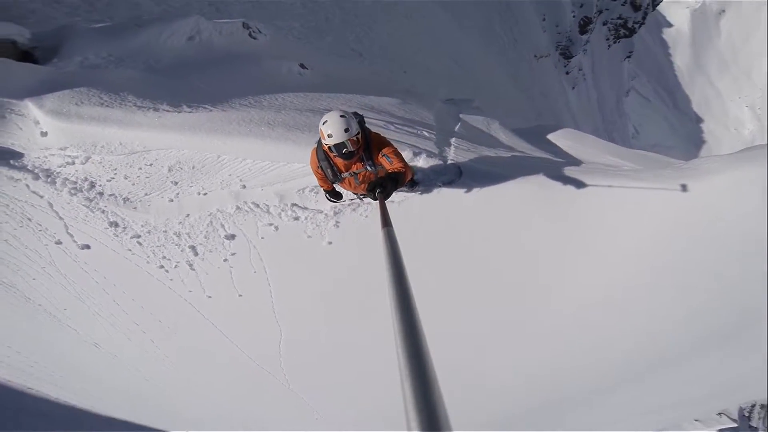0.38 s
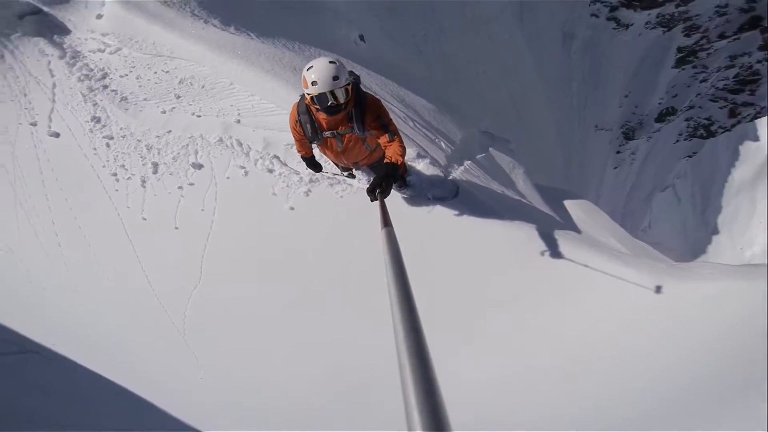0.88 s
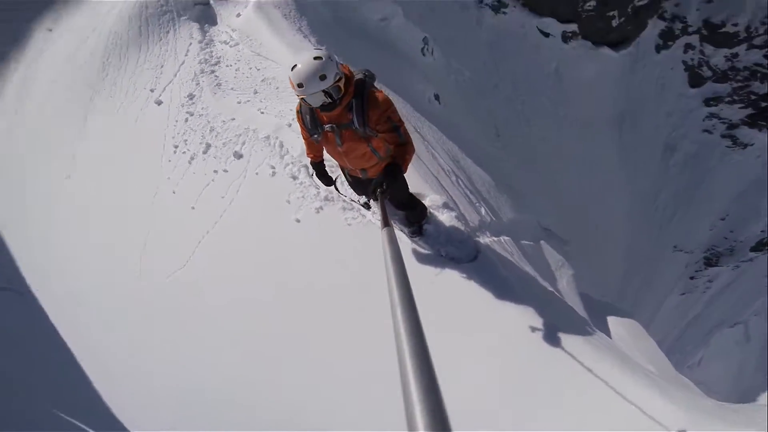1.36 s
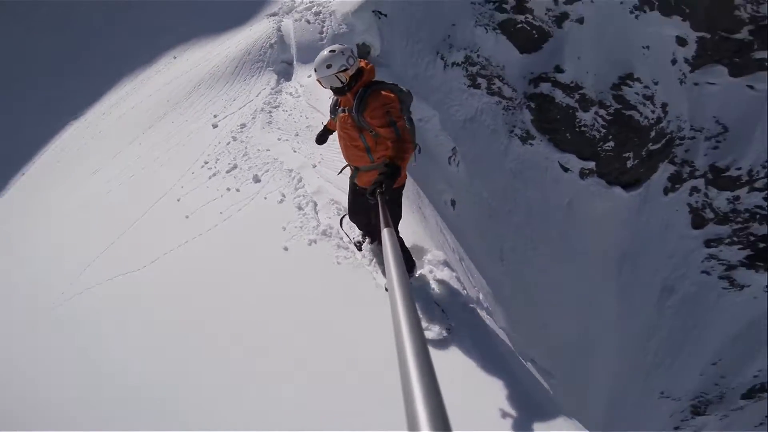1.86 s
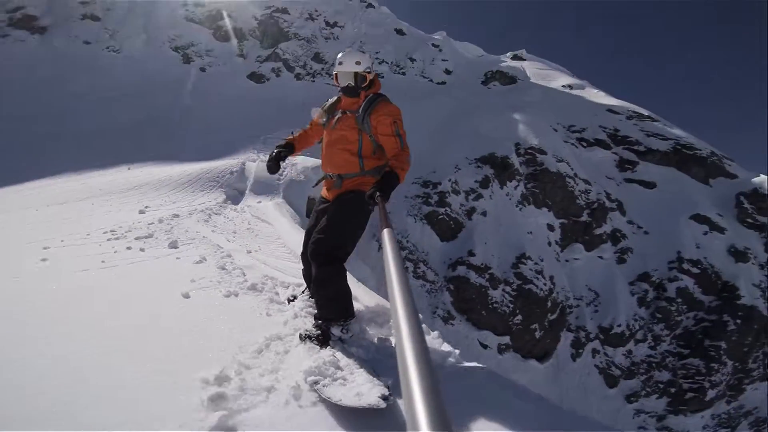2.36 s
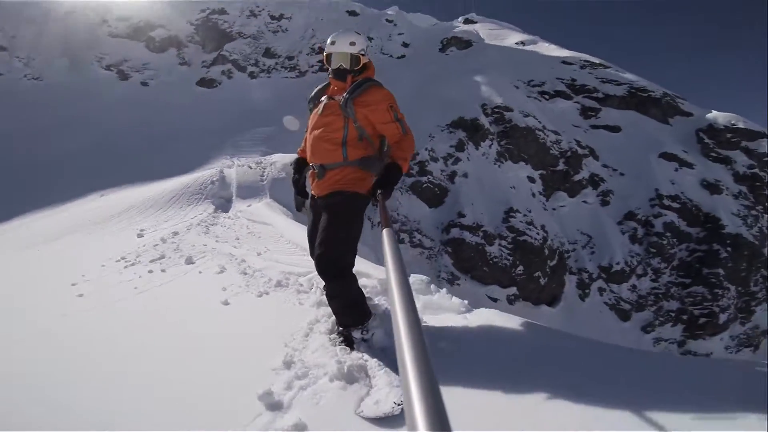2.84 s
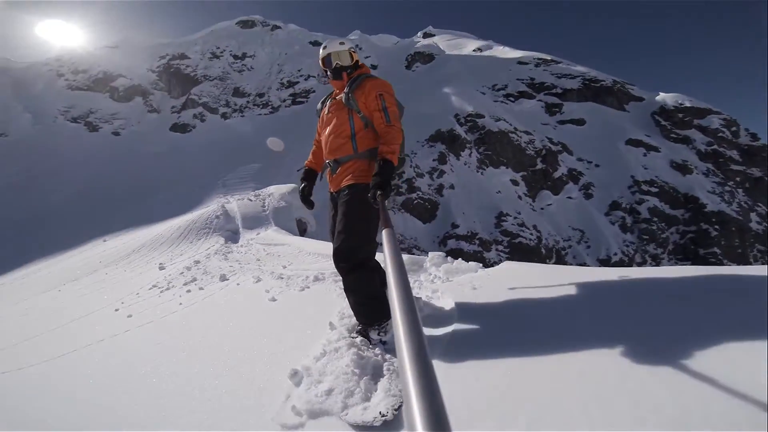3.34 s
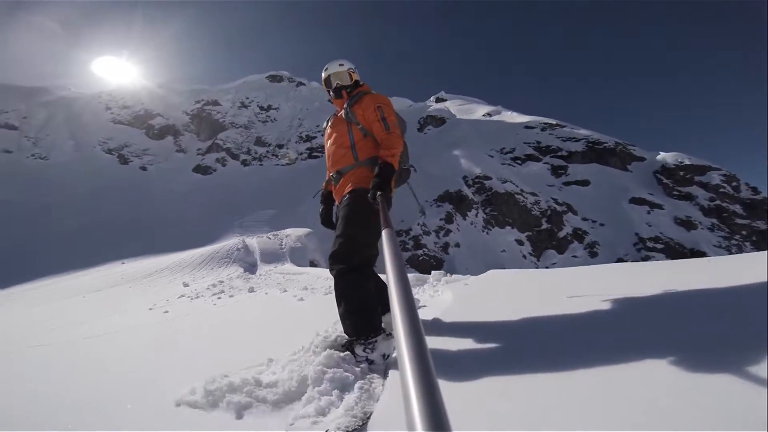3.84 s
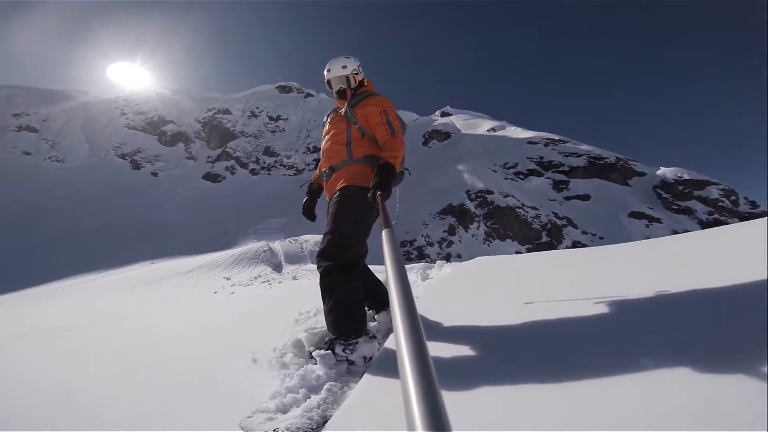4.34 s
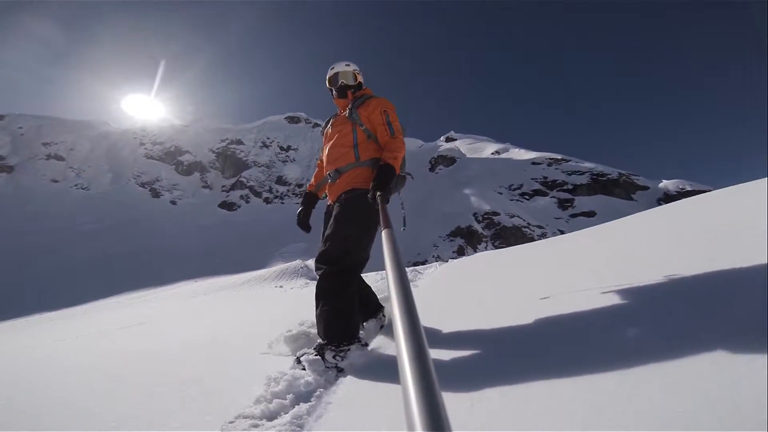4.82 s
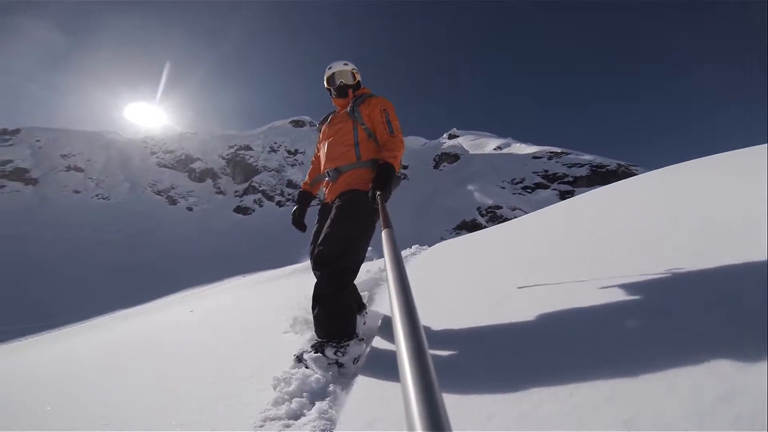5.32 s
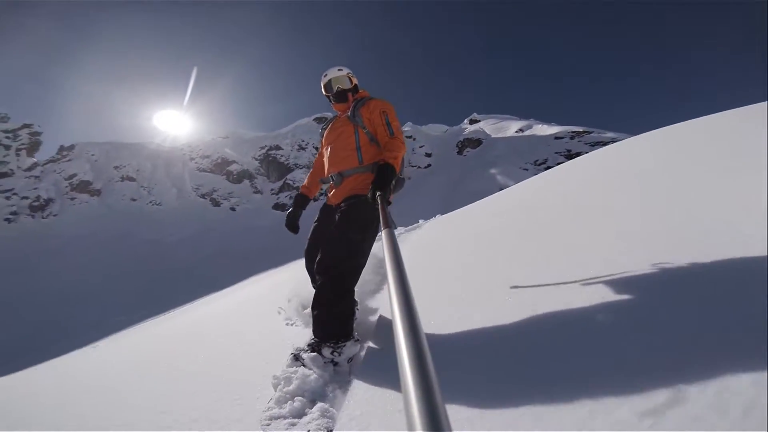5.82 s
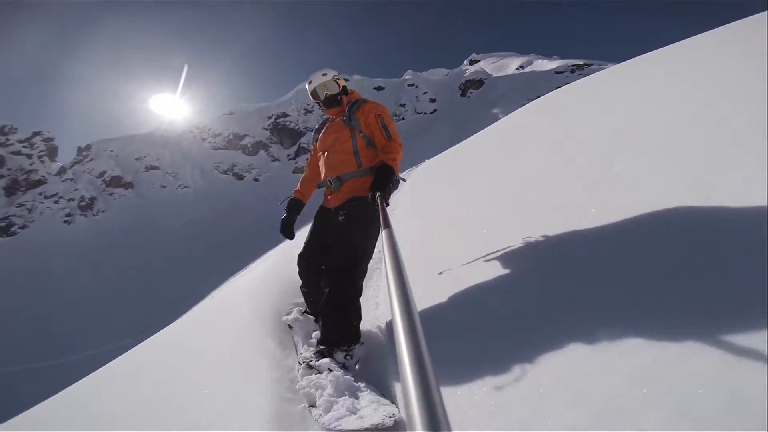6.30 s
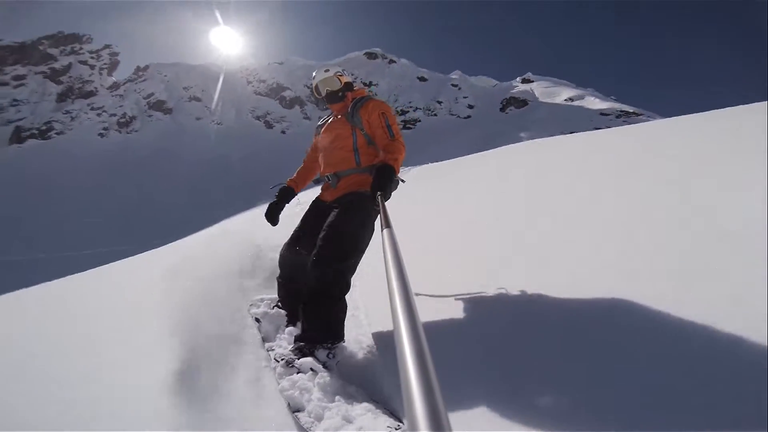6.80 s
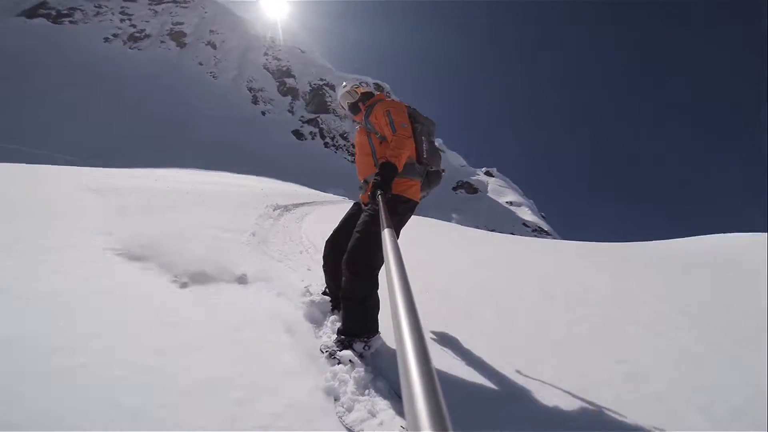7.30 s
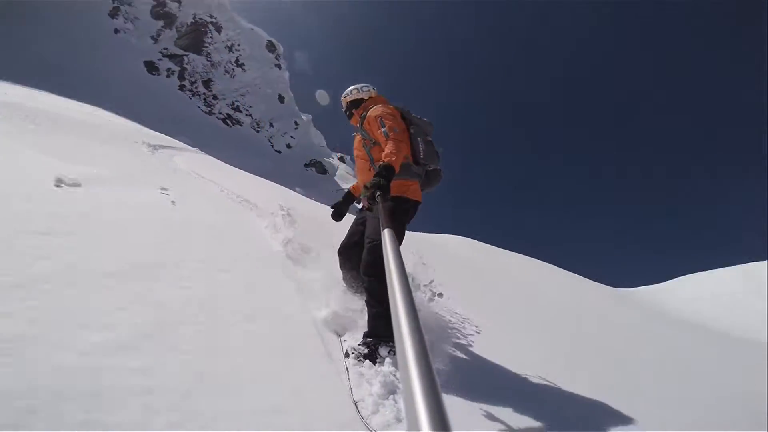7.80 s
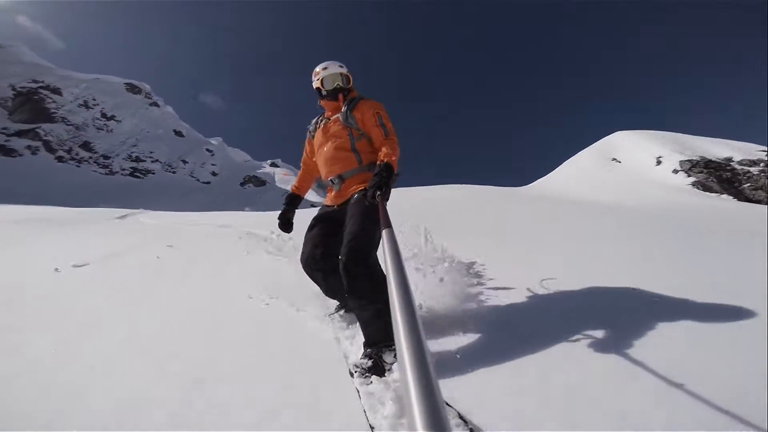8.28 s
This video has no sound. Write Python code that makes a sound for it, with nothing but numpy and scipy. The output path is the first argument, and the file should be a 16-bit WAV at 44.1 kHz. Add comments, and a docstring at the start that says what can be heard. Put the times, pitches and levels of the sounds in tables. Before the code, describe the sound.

Muffled bass wind buffets run throughout, heard close up through a sealed camera housing. A glove squeaks and rubs on the pole, a click snaps, small hollow ticks rattle, and a strong knock arrives with overloaded low thumps. The ride then smooths out: a breathy hum passes, snow grains hiss and the board base rushes faintly over open powder. A lone knock and a final flurry of handling noise come near the end.

```python
"""A small camera in a closed housing, on a hand-held pole in front of a snowboarder on an open slope.
Deep wind and pole-sway thumps run throughout over a faint hiss; early on the glove rubs the pole.
At 1.5 s there is a sharp click; pole ticks follow, with the hardest gust, rub and knock near 2.9 s.
As speed builds, board rush, spray hiss and a passing hum grow from filtered noise; a narrow hiss
joins from 4.8 to 6.1 s. Late rubs and ticks, clicks ringing the housing modes, come at 8.2 s."""
import sys
import numpy as np
from scipy import signal
from scipy.fft import rfft, irfft, next_fast_len
from scipy.io import wavfile
from scipy.ndimage import uniform_filter1d

SR = 44100
rng = np.random.default_rng(int(sys.argv[2]) if len(sys.argv) > 2 else 0)


def generate_wav(sig):
    """Save sig (samples, or channels by samples) to the path in sys.argv[1] as 16-bit PCM at SR."""
    pcm = np.round(np.clip(np.atleast_2d(sig).T, -1, 1) * 32767).astype(np.int16)
    wavfile.write(sys.argv[1], SR, pcm)


def boost(x):
    """Linear amplitude factor 10**(x/20) for a level x in decibels (scalar or array-like)."""
    u = np.asarray(x, float) / 20
    return 10 ** u


N = 370881


def rms_one(x):
    """Scale to rms 1."""
    return x / np.sqrt(np.mean(x ** 2) + 1e-20)


def in_time(rows):
    """Each column of a curve, interpolated to every sample."""
    time_s, *columns = np.transpose(rows)
    return [np.interp(np.arange(N) / SR, time_s, column) for column in columns]


def drift(rate_hz):
    """Slow random curve of rms 1: noise twice through a one-pole low-pass, drawn at SR / 20."""
    pole = np.exp(-40 * np.pi * rate_hz / SR)
    noise = rng.standard_normal(N // 20 + 3002)
    slow = signal.lfilter([1], [1, -2 * pole, pole * pole], noise)[3000:]  # settled part
    return np.interp(np.arange(N) / 20, np.arange(len(slow)), rms_one(slow))


def coloured(spectrum):
    """Noise with the given spectrum, rms 1."""
    size = next_fast_len(N)
    hz, db = np.transpose(spectrum)
    bin_hz = np.fft.rfftfreq(size, 1 / SR)
    gain = boost(np.interp(np.log(bin_hz + 1), np.log(hz), db))
    return rms_one(irfft(rfft(rng.standard_normal(size)) * gain, size)[:N])


def resonance(x, hz, width_hz):
    """Two-pole resonance with gain 1 on top."""
    r = np.exp(-np.pi * width_hz / SR)
    numerator = np.array([1, 0, -1]) * (1 - r * r) / 2
    denominator = [1, -2 * r * np.cos(2 * np.pi * hz / SR), r * r]
    return signal.lfilter(numerator, denominator, x + 1e-18)


def butter(x, order, hz, kind="low"):
    """Butterworth filter along the last axis."""
    return signal.sosfilt(signal.butter(order, hz, kind, fs=SR, output="sos"), x)


def hiss(peaks, patchy_db, rate_hz, order=1):
    """Noise in resonances that swell slightly together, mostly alone; order 2 darkens the valleys; rms 1."""
    together, out = drift(rate_hz), 0
    for hz, width_hz, db in peaks:
        band = rng.standard_normal(N)
        for _ in range(order):
            band = resonance(band, hz, width_hz)
        swell_db = patchy_db * (0.06 * together + drift(rate_hz * 5.9))
        out = out + boost(db + swell_db) * band
    return rms_one(out)


# Microphone hiss peaks, shaped by its port: [centre_hz, width_hz, gain_db]
SELF_NOISE_PEAKS = [(1470, 1340, 2), (3035, 320, 10), (5130, 590, -2.5), (6900, 2200, -10), (10290, 260, 0),
                    (11220, 750, -4), (13400, 600, -10)]
SELF_NOISE_DB = -67


def self_noise():
    """The microphone's own hiss: noise through the resonances of its port."""
    return boost(SELF_NOISE_DB) * hiss(SELF_NOISE_PEAKS, patchy_db=3.0, rate_hz=21.0)


HIGH_HISS_HZ, HIGH_HISS_WIDTH_HZ, HIGH_HISS_DB = 7070, 1400, -73
HIGH_HISS_FROM_S, HIGH_HISS_TO_S, HIGH_HISS_FADE_DB_PER_S = 4.77, 6.1, 41


def high_hiss():
    """Narrow treble hiss: noise twice through one resonance, held for a while, faded at both ends."""
    t = np.arange(N) / SR
    outside_s = np.maximum(np.maximum(HIGH_HISS_FROM_S - t, t - HIGH_HISS_TO_S), 0)
    band = hiss([(HIGH_HISS_HZ, HIGH_HISS_WIDTH_HZ, 0)], patchy_db=-1.5, rate_hz=8.7, order=2)
    return boost(HIGH_HISS_DB - HIGH_HISS_FADE_DB_PER_S * outside_s) * band


# Gusts on the housing: [time_s, rumble_db]
GUSTS = [(0.0, -20.5), (0.14, -34), (0.44, -25.5), (0.49, -38), (0.63, -21.5), (0.91, -18), (1.2, -28),
         (1.59, -24.5), (1.75, -19), (1.87, -21.5), (1.96, -26), (2.36, -23.5), (2.44, -22.5),
         (2.55, -23.5), (2.71, -18), (2.81, -36), (2.9, -12), (2.98, -7.5), (3.06, -12), (3.15, -7.5),
         (3.3, -24), (3.54, -20.5), (3.75, -24.5), (3.93, -31), (4.3, -28), (4.65, -29.5), (4.85, -25),
         (4.92, -30.5), (5.7, -32.5), (6.0, -27), (6.9, -30.5), (7.2, -23.5), (7.45, -26.5), (7.89, -24.5),
         (8.05, -22.5), (8.25, -17.5), (8.41, -18)]
# Upper rumble against the gusts: [time_s, swell_db]
UPPER_RUMBLE_SWELL = [(0, 2), (0.3, 1), (0.75, -1.5), (1.2, -3), (1.8, 2), (2.3, -1), (2.95, 3), (3.2, 0),
                      (4.0, -0.5), (4.8, -0.5), (5.25, 5), (5.75, 2), (6.2, 1.5), (6.75, 4.5), (7.3, 0.5),
                      (7.8, -1), (8.1, -4.5), (8.41, -4)]
# Rumble spectrum, relative: [freq_hz, density_db_per_hz]
RUMBLE_SPECTRUM = [(3.5, -41), (6.0, -9), (27, 3.5), (38, -0.5), (52, -6.5), (65, -37.5), (70, -47),
                   (91, -70), (150, -120)]
# Upper rumble spectrum, relative: [freq_hz, density_db_per_hz]
UPPER_RUMBLE_SPECTRUM = [(32, -49.5), (55, -1), (65, -6.5), (102, -14), (160, -33), (210, -61.5),
                         (350, -120)]
# Air rush spectrum, relative: [freq_hz, density_db_per_hz]
AIR_SPECTRUM = [(76, -36.5), (130, -7), (211, -3.5), (317, -7.5), (420, -9.5), (1200, -22), (1560, -57.5),
                (2640, -120)]
GUST_SMOOTH_S = 0.18  # upper layers follow the gusts this slowly
UPPER_DB, UPPER_FOLLOWS = -12.5, 1.205  # offset, share of the gust level in dB
RUSH_DB, RUSH_FOLLOWS = -44, 0.72  # likewise
HEADWIND_DB = -5  # against the board's rush


def wind():
    """Lumpy bass pressure swings; upper rumble and a faint rush follow the gusts, the rush also the ride."""
    rumble_db, = in_time(GUSTS)
    swell_db, = in_time(UPPER_RUMBLE_SWELL)
    board_db, _ = in_time(RIDE)
    gust_db = uniform_filter1d(rumble_db, size=int(GUST_SMOOTH_S * SR))
    low = boost(rumble_db) * coloured(RUMBLE_SPECTRUM)
    upper_db = UPPER_DB + swell_db + UPPER_FOLLOWS * gust_db + 2.26 * drift(5.4)
    upper = boost(upper_db) * coloured(UPPER_RUMBLE_SPECTRUM)
    rush_gain = np.hypot(boost(RUSH_DB + RUSH_FOLLOWS * gust_db), boost(HEADWIND_DB + board_db))
    rush = rush_gain * boost(2.17 * drift(7.5)) * coloured(AIR_SPECTRUM)
    return low + upper + rush


CLICK_S, CLICK_DB, CLICK_FADE_S = 1.4895, -19, 0.016  # CLICK_DB: height of the whole step


def step_click():
    """A sharp click: the waveform slides down, steps up at once and decays back, both exponentially."""
    t = np.arange(N) / SR - CLICK_S
    return boost(CLICK_DB) / 2 * np.sign(t) * np.exp(-np.abs(t) / CLICK_FADE_S)


POLE_CUT_HZ = 4800


def through_pole(x):
    """Low-pass: soft contacts send little treble through pole and mount."""
    return butter(x, 6, POLE_CUT_HZ)


# Housing and pole modes: [centre_hz, width_hz, gain_db]
HOUSING_MODES = [(200, 37, -1), (350, 98, -4.5), (441, 57, -7), (610, 72, -3.5), (930, 440, -14.5),
                 (1310, 115, 3), (1490, 127, 1.5), (1658, 74, 4), (1840, 170, -15), (2103, 200, -7.5),
                 (2380, 320, -14.5), (2700, 86, -9), (2970, 100, -9)]


def housing(clicks, sway=lambda: 1):
    """Low, middle, high modes (split at 1.1, 2 kHz) rung by clicks, rms 1 each; sway: gain per mode."""
    groups = np.zeros((3,) + clicks.shape)
    for k, (hz, width_hz, db) in enumerate(HOUSING_MODES):
        group = int(hz > 1100) + int(hz > 2000)
        sign = (-1) ** k
        groups[group] += sign * boost(db) * sway() * resonance(clicks, hz, width_hz)
    groups = through_pole(groups)
    return groups / np.sqrt(np.mean(groups ** 2, axis=-1, keepdims=True))


# Ticks and knocks in the pole; low and high rings relative to the middle one:
# [start_s, peak_db, knock_db, low_db, high_db]
POLE_TICKS = [(0.606, -40, -57, -5, -17), (0.716, -38, -60, -15, -9), (1.5623, -42, -24.5, 10, -26),
              (2.2224, -49.5, -44, 6, 0), (2.251, -41, -36, 4, -6), (2.2759, -44, -37, 3, -4),
              (2.303, -41, -52, 1.5, -7), (2.367, -41, -35, -1, -12), (2.453, -50.5, -72, -12, -3),
              (2.5095, -46, -61, 1.5, -10), (2.692, -38.5, -39, 1, -13), (2.7455, -34.5, -35.5, 0, -8.5),
              (2.817, -42.5, -43, 5.5, -4), (2.8843, -37, -52.5, -5, -6), (2.912, -20, -24, -2.5, -18),
              (3.034, -51, -23, -8, -7), (3.1996, -38.5, -39, -5, -14), (3.24, -39.5, -41.5, -1, -6),
              (3.4368, -34.5, -46, -18, -6), (3.499, -55, -70, -8, 8), (3.5558, -33, -69, 2, -1.5),
              (3.6404, -42.5, -61, 4.5, -5), (3.71, -45, -40.5, 9.5, -3), (3.8207, -41.5, -43, 6, -4),
              (4.34, -44.5, -58, 6, -4.5), (6.994, -24, -28, 2, -5), (8.228, -31.5, -29, -1, -28),
              (8.255, -32.5, -45, 1, -7.5), (8.2998, -33, -51, 2, -24)]
# Pole swings after a knock: [freq_hz, gain_db, t60_s]
KNOCK_SWINGS = [(97, 5.5, 0.16), (164.5, -4.5, 0.14), (217.3, 0.5, 0.093), (326, -2, 0.059),
                (404, -21, 0.13), (559, -26, 0.11), (926, -21, 0.12), (1393, -9, 0.033)]
FLURRY_T60_S, FLURRY_RISE_S = 0.021, 0.0011
MAIN_TOUCH_S, MAIN_TOUCH_SIZE = 0.0012, 4.5  # hard contact just after the first; size before the envelope
CRACK_DB, CRACK_EDGE_DB = -3, 3.5  # dry crack's body and edge, before band-limiting, against the rings' rms
CRACK_T60_S, CRACK_BODY_HZ, CRACK_EDGE_HZ = 0.0024, 1470, (2000, 3370)  # t60 on top of the flurry's
TICK_THIN_HZ, TICK_MIDDLE_CUT_HZ = 490, 1670  # low ring's lower limit, middle ring's upper limit
TICK_LOW_DB, TICK_HIGH_DB = -4.5, -3  # added to each tick's low_db, high_db


def ticks():
    """A flurry of contacts dying in milliseconds rings the housing; a slow push swings the pole."""
    start_s, peak_db, knock_db, low_db, high_db = np.transpose(POLE_TICKS)[:, :, None]
    t = np.arange(4400) / SR
    shape = (len(start_s), len(t))
    contacts = rng.standard_normal(shape) * (rng.random(shape) < 0.12)
    contacts[:, 0] = 1.5  # first touch always lands
    contacts[:, int(MAIN_TOUCH_S * SR)] = MAIN_TOUCH_SIZE
    envelope = boost(-60 * t / FLURRY_T60_S) * (1.15 - np.exp(-t / FLURRY_RISE_S))
    flurry = through_pole(contacts * envelope)
    low, middle, high = housing(flurry)

    # dry crack, past the housing modes
    crack = flurry * boost(-60 * t / CRACK_T60_S)
    crack = crack / np.sqrt(np.mean(crack ** 2, axis=1, keepdims=True))
    low = low + boost(CRACK_DB) * butter(crack, 4, CRACK_BODY_HZ)
    high = high + boost(CRACK_EDGE_DB) * butter(crack, 3, CRACK_EDGE_HZ, "band")

    low = butter(low, 2, (TICK_THIN_HZ, CRACK_BODY_HZ), "band")
    middle = butter(middle, 4, TICK_MIDDLE_CUT_HZ)
    high = butter(high, 6, CRACK_EDGE_HZ[1])
    low, middle, high = (ring / np.abs(ring).max(axis=1, keepdims=True) for ring in (low, middle, high))
    low = boost(TICK_LOW_DB + low_db) * low
    high = boost(TICK_HIGH_DB + high_db) * high
    rings = boost(peak_db) * (low + middle + high)

    end_fade = np.cos(np.pi / 2 * t / t[-1])
    for hz, db, t60_s in KNOCK_SWINGS:
        swing = np.sin(2 * np.pi * hz * t) * boost(-60 * t / t60_s) * (1 - np.exp(-t / 0.0031))
        rings = rings - boost(knock_db + db) * swing * end_fade
    out = np.zeros(N + len(t))
    np.add.at(out, (start_s * SR).astype(int) + np.arange(len(t)), rings)
    return out[:N]


# Glove strokes on the pole; low and high rings relative to the middle one:
# [start_s, length_s, level_db, change_db, high_db, low_db, pitch_hz]
GLOVE_STROKES = [(0.57, 0.017, -63, 5, -14, -4, 1500), (0.608, 0.048, -48.5, -8, -7.5, -5, 1450),
                 (0.666, 0.056, -47.5, 0, -8.5, -4, 1660), (0.723, 0.066, -46.5, -3, -5, -4, 1630),
                 (0.8, 0.075, -59.5, 5, -9, -5, 1500), (0.899, 0.11, -45.5, -6, -12.5, -2, 1580),
                 (1.027, 0.063, -64.5, -5, -14, 5, 1450), (2.854, 0.02, -59, 3, -1, -11, 1600),
                 (2.892, 0.077, -32, 3.5, -13.5, -6, 1670), (2.994, 0.036, -50, -9, -16, 3.5, 1640),
                 (3.032, 0.081, -41, -4, -10.5, -1, 1540), (3.115, 0.19, -53, -2, -11.5, -1.5, 1550),
                 (3.324, 0.27, -62, 3, -13, -1, 1560), (8.211, 0.087, -51, -3, -22, -3, 1500),
                 (8.3, 0.13, -50, 5.5, -18, -3, 1300)]
# High modes, loudest under hard strokes: [centre_hz, width_hz (each of two passes), gain_db]
BITE_MODES = [(3500, 200, 6), (4720, 130, -7), (5650, 100, -16.5), (6150, 150, -9)]
BITE_DB, BITE_FULL_AT_DB, BITE_GROWS = -27.5, -35, 0.15  # share at that stroke level; dB gained per dB
RUB_ATTACK_DB_PER_S, RUB_RELEASE_DB_PER_S = 1192, 689
RUB_ARCH_DB, RUB_SWAY_DB, RUB_CLUMP_DB = 1.5, 1.2, 2.2  # stroke strongest midway; mode sway; slip clumping
RUB_FOCUS_WIDTH_HZ, RUB_FOCUS_SHARE = 140, 0.51  # middle modes favoured near pitch_hz
RUB_EDGE_HZ = 2970


def glove():
    """Stick and slip: dense uneven clicks in clumps ring the housing; strokes set in fast and trail off."""
    slips = rng.random(N) < 5500.0 * boost(2.6 * drift(90)) / SR
    size_db = 2.2 * np.minimum(rng.exponential(1, N), 5) + RUB_CLUMP_DB * drift(40)
    clicks = slips * boost(size_db) * rng.choice([-1, 1], N)
    low, middle, high = housing(clicks, sway=lambda: boost(RUB_SWAY_DB * drift(10.7)))
    high = butter(high, 8, RUB_EDGE_HZ)
    bite = 0
    for hz, width_hz, db in BITE_MODES:
        mode = resonance(resonance(clicks, hz, width_hz), hz, width_hz)
        bite = bite + boost(db + 4.2 * drift(60)) * mode
    bite = rms_one(bite)

    out = np.zeros(N)
    for start_s, length_s, level_db, change_db, high_db, low_db, pitch_hz in GLOVE_STROKES:
        t = np.arange(N) / SR - start_s
        attack_db = RUB_ATTACK_DB_PER_S * np.minimum(t, 0)
        release_db = -RUB_RELEASE_DB_PER_S * np.maximum(t - length_s, 0)
        edges_db = np.maximum(attack_db + release_db, -120)
        along = np.clip(t / length_s, 0, 1)
        arch_db = -RUB_ARCH_DB * (2 * along - 1) ** 2
        stroke_db = level_db + change_db * along + arch_db + edges_db
        near_pitch = resonance(middle, pitch_hz, RUB_FOCUS_WIDTH_HZ)
        focused = rms_one((1 - RUB_FOCUS_SHARE) * middle + RUB_FOCUS_SHARE * near_pitch)
        bite_db = BITE_DB + BITE_GROWS * (level_db - BITE_FULL_AT_DB)
        rub = boost(low_db) * low + focused + boost(high_db) * high + boost(bite_db) * bite
        out += boost(stroke_db) * rub
    return out


# The ride, rush of the base and spray off the edge; wind() reads the rush too: [time_s, rush_db, spray_db]
RIDE = [(0, -78.5, -95), (1.05, -71, -79), (1.55, -63.5, -95), (1.8, -71.5, -97), (2.9, -64.5, -70),
        (3.3, -57, -73.5), (3.9, -70, -71.5), (4.5, -69, -75), (4.9, -66, -67.5), (5.55, -59.5, -66.5),
        (6.13, -55, -62), (6.7, -58, -59), (7.1, -59.5, -63.5), (7.48, -56, -58.5), (7.65, -56, -62.5),
        (8.0, -55, -59.5), (8.18, -55, -65), (8.41, -61, -66.5)]
# Spray hiss peaks: [centre_hz, width_hz, gain_db]
SPRAY_PEAKS = [(2810, 320, 7.5), (3920, 360, 6.5), (4740, 120, 5.5), (5220, 740, 0), (6070, 330, 2),
               (7180, 740, 1), (8240, 250, -5), (12900, 1100, -13)]
# Board rush peaks: [centre_hz, width_hz (each of two passes), gain_db]
BOARD_PEAKS = [(609, 120, -5.5), (910, 450, -12), (1343, 200, -2.5), (1483, 296, 2), (1825, 130, -8.5),
               (2393, 560, -10)]
# Breathy hum peaks: [centre_hz, width_hz (each of two passes), gain_db]
HUM_PEAKS = [(297, 70, -4), (424, 39, -3), (819, 99, -8.5)]
HUM_PEAK_S, HUM_PEAK_DB, HUM_RISE_DB_PER_S, HUM_FALL_DB_PER_S = 5.71, -59.5, 18.5, 3.5


def board():
    """Bright spray of snow grains over a duller rush and hum of the base, all resonant noise."""
    rush_db, spray_db = in_time(RIDE)
    t = np.arange(N) / SR - HUM_PEAK_S
    hum_db = HUM_PEAK_DB + np.minimum(HUM_RISE_DB_PER_S * t, -HUM_FALL_DB_PER_S * t)
    spray = hiss(SPRAY_PEAKS, patchy_db=1.9, rate_hz=16.0)
    rush = hiss(BOARD_PEAKS, patchy_db=1.0, rate_hz=5.0, order=2)
    hum = hiss(HUM_PEAKS, patchy_db=1.5, rate_hz=2.5, order=2)
    return boost(spray_db) * spray + boost(rush_db) * rush + boost(hum_db) * hum


def scene():
    """All sources and the click, over the microphone's own hiss."""
    floor = self_noise()
    mix = wind() + board() + high_hiss() + glove() + ticks() + step_click() + floor
    return mix[None]


def band_limit(x):
    """A steep low-pass at the top of the band."""
    return signal.sosfilt(signal.butter(12, 15280, fs=SR, output="sos"), x)


def record(dry):
    """Overload: tanh rounds the loudest swings towards full scale."""
    mix = np.tanh(dry)
    return band_limit(mix)


dry = scene()
out = record(dry)
generate_wav(out)
```